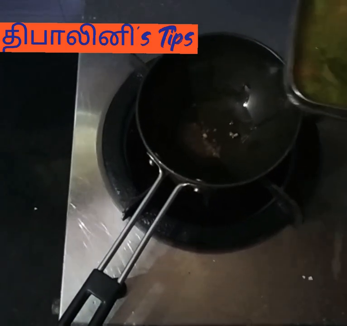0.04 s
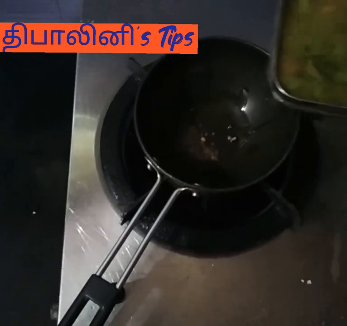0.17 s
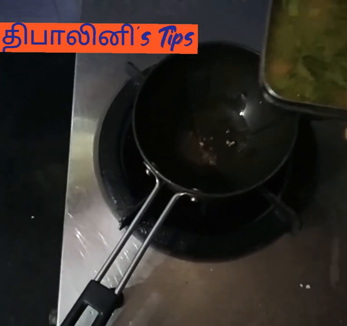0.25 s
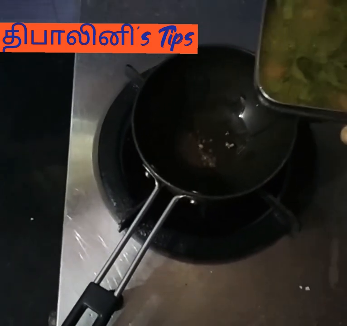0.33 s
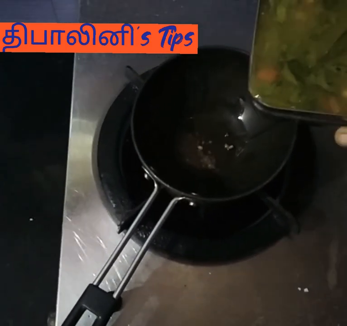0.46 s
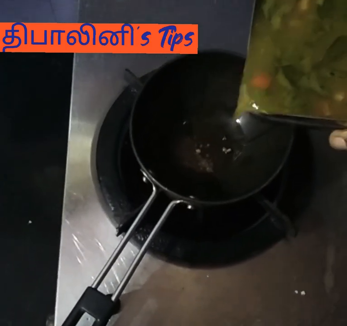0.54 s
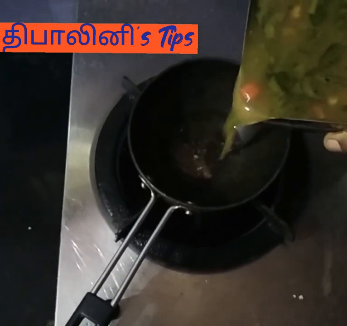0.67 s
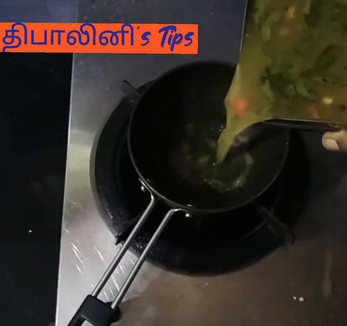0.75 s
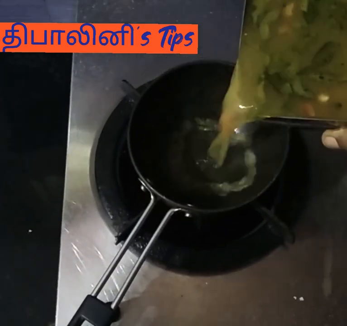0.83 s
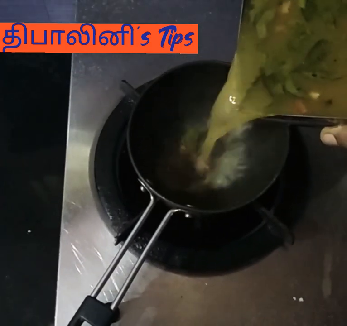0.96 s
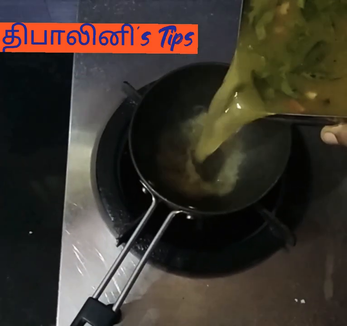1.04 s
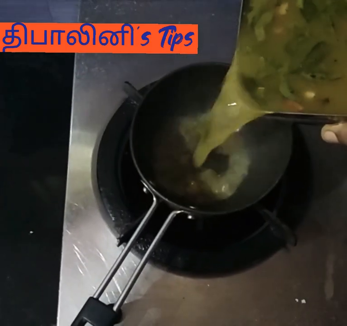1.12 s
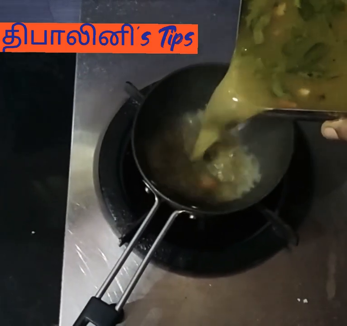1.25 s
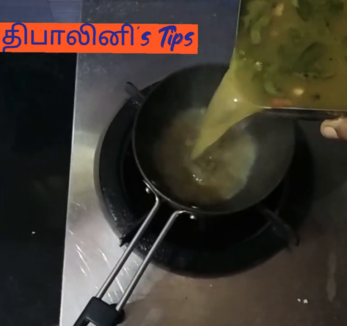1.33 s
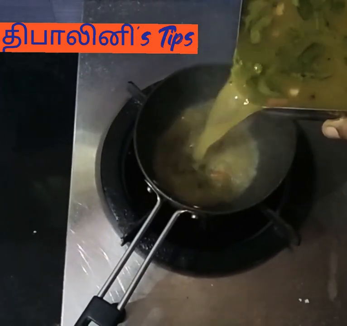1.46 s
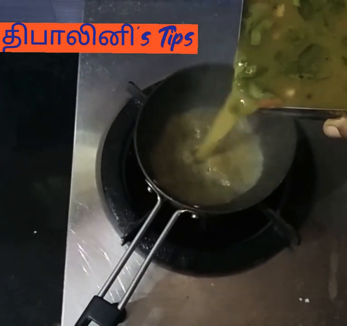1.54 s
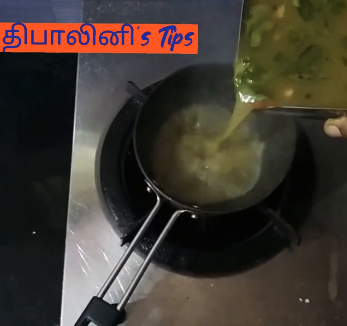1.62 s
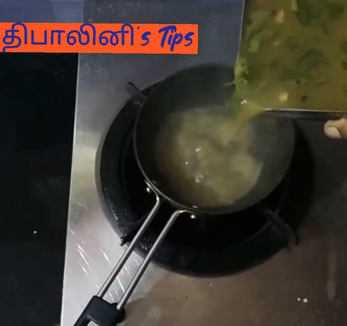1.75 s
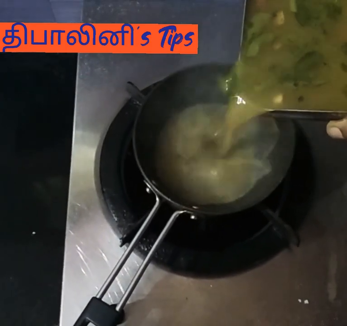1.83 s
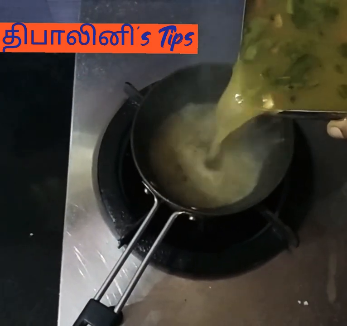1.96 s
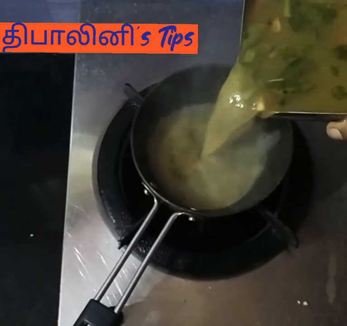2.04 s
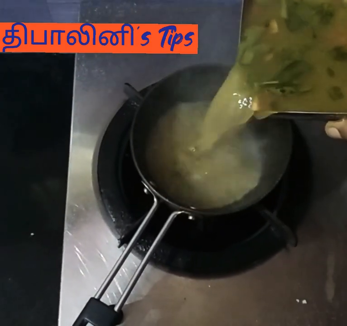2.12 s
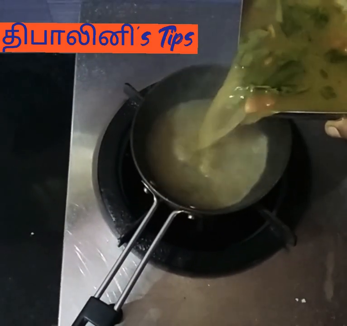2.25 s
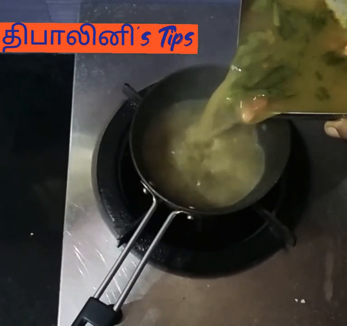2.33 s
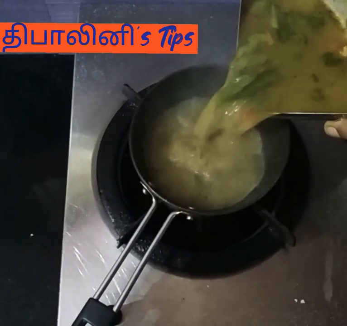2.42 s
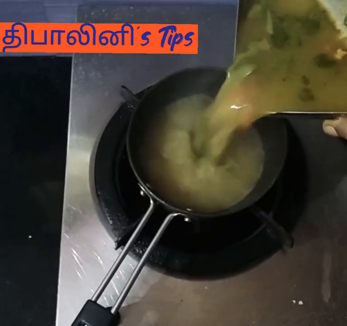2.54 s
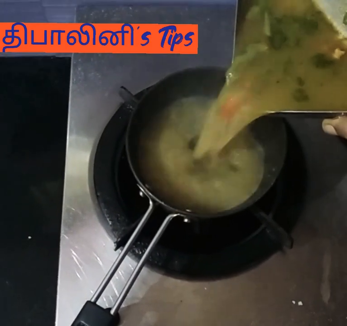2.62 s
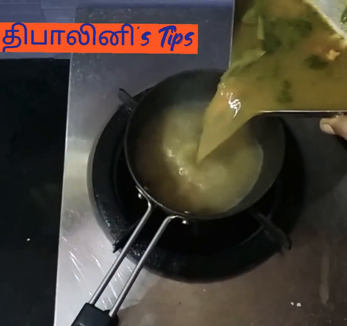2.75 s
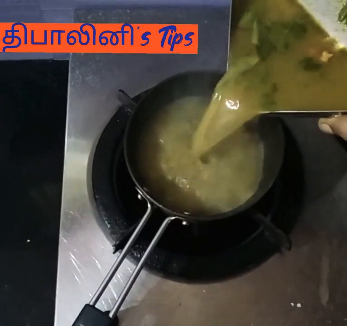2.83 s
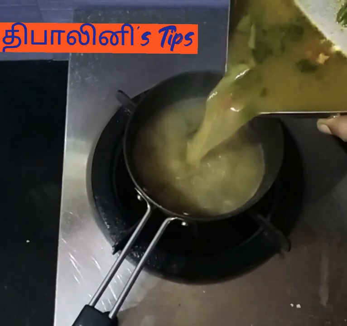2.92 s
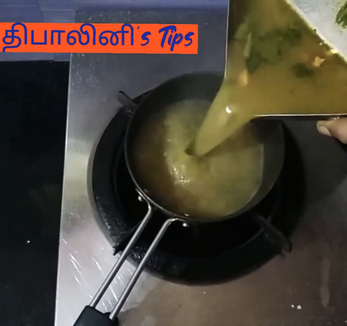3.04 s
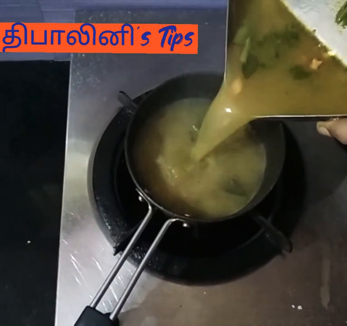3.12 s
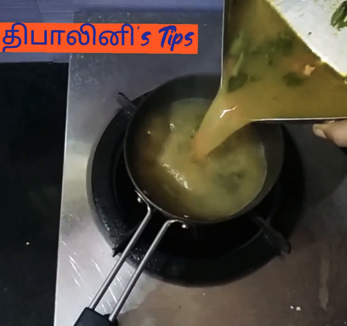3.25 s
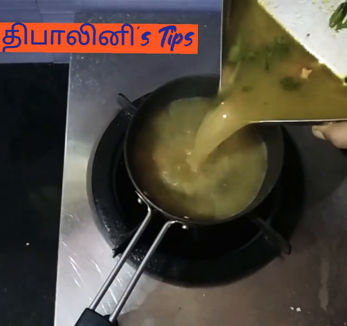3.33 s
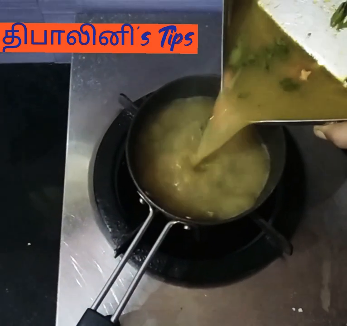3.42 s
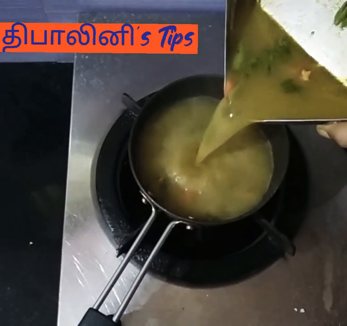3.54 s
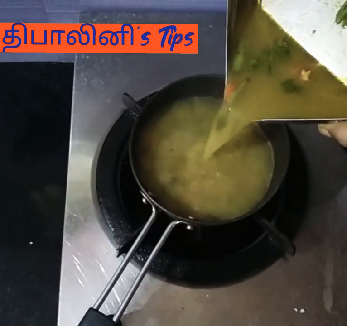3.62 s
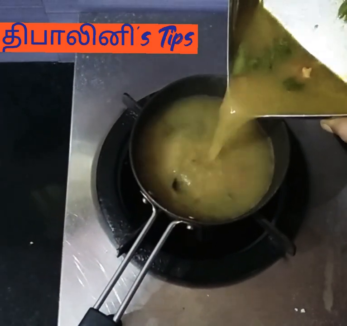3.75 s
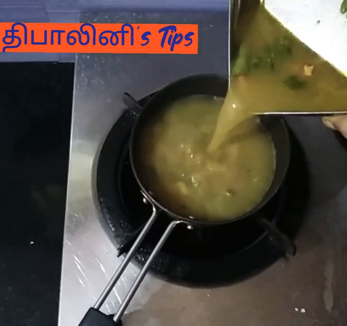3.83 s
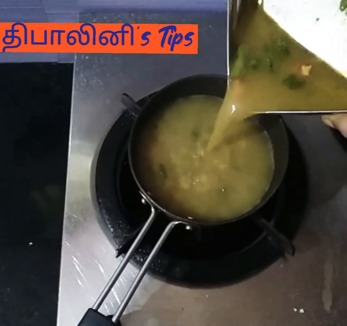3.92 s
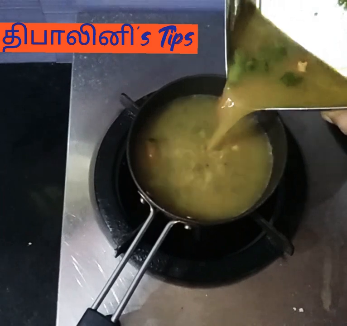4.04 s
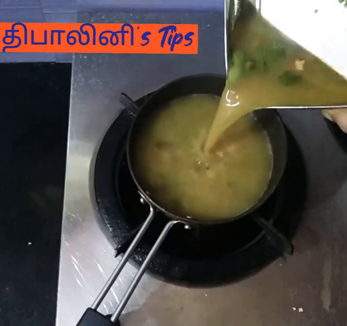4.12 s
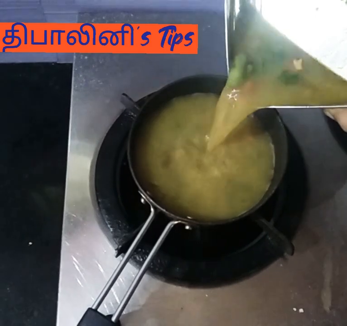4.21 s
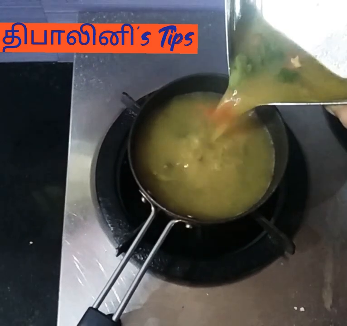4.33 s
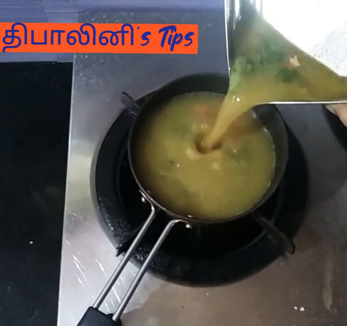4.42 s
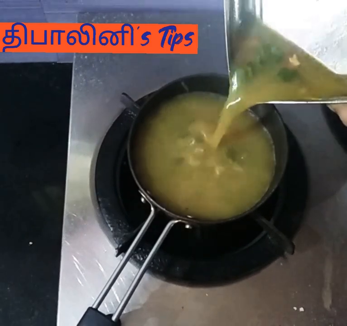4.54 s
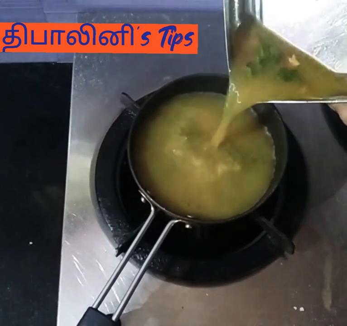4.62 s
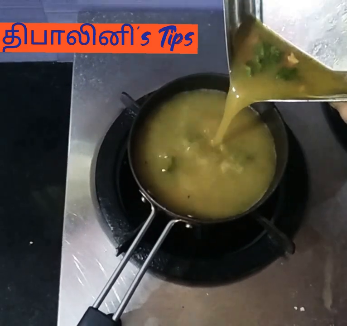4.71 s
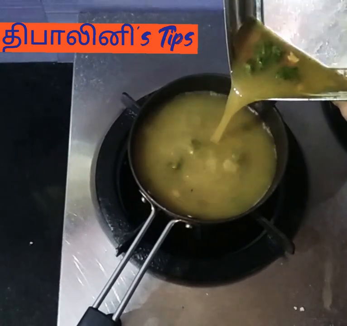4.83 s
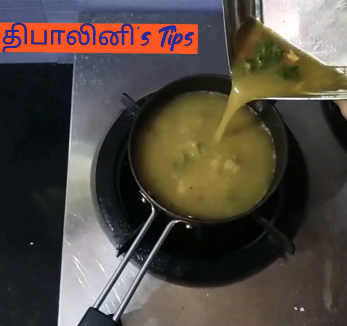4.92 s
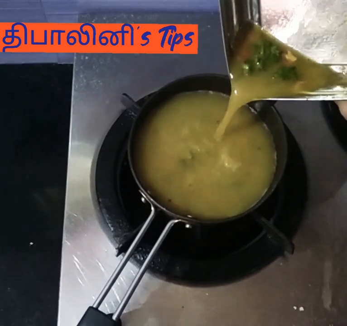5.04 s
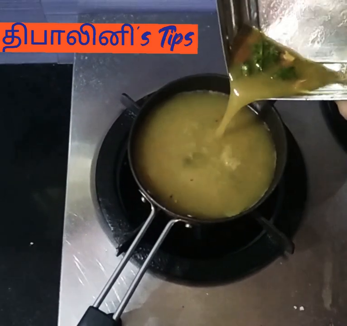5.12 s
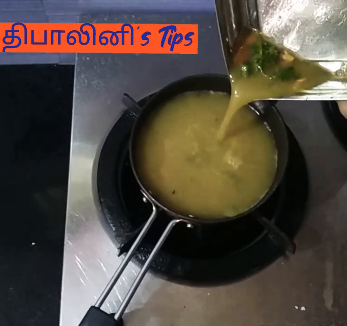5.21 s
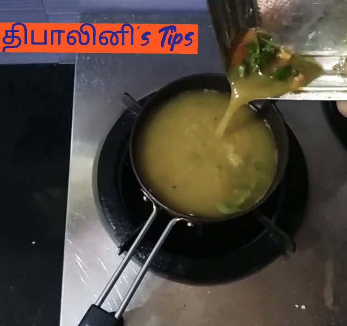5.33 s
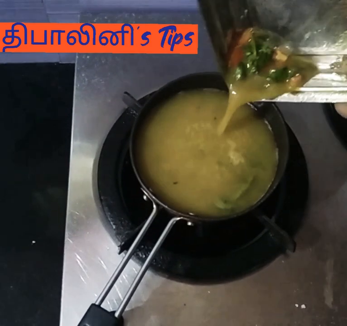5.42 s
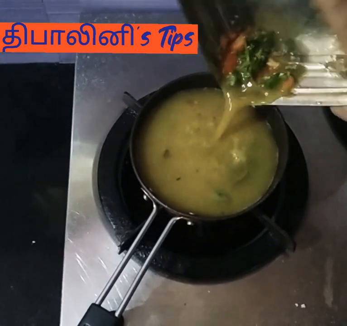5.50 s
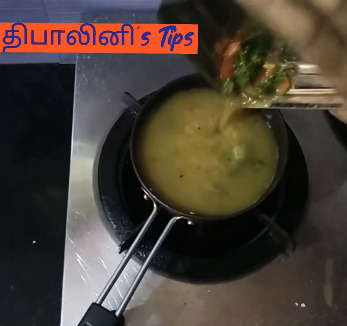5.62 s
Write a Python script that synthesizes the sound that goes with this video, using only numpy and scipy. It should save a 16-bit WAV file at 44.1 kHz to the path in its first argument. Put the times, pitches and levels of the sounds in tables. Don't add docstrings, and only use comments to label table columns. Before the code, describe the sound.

A quiet kitchen with faint frying for half a second, then thin soup poured into very hot oil in a small metal pan. Snaps at contact give way at once to a dense, bright, crackling sizzle with a ringing pan colour. It holds until about four seconds, then fades as the pan cools, leaving sharp spits and a few low plops. Close phone from above, overloading on the hardest spits.

```python
import sys
import numpy as np
from scipy import signal
from scipy.io import wavfile
from scipy.ndimage import uniform_filter1d

SR = 44100
rng = np.random.default_rng(int(sys.argv[2]) if len(sys.argv) > 2 else 0)


def linear_from_db(decibels):
    return 10 ** (np.asarray(decibels, float) / 20)


def generate_wav(sig):
    pcm = np.round(np.clip(np.atleast_2d(sig).T, -1, 1) * 32767).astype(np.int16)
    wavfile.write(sys.argv[1], SR, pcm)


N = 250047
POUR_START_S = 0.49
CONTROL_STEP = 128
HOP, FIRST_FRAME, BAND_BINS = 928, 300, 32

# start_s, height (signed, 0-1 of full scale)
SPIKES = [
    (.5999, -.7),
    (.9603, .75),
    (1.0163, .6),
    (4.2260, .6),
    (4.3383, .55),
    (4.8560, .65),
    (5.3573, .8),
]


def sizzle():
    # pitch_hz, level_db (per Hz)
    sizzle_colour = [(150, -26), (250, -30.5), (860, -14.5), (938, -18.5), (1140, -15.5), (1420, -12),
                     (1950, -11), (5630, -4.5), (9830, 1.5), (16000, -2)]
    # pitch_hz, width_hz, lift_db
    pan_modes = [(537, 9.2, 8.5), (868, 36, 5), (1410, 44, -5.5), (2660, 110, -3), (1133, 14, 8),
                 (1153, 25, 8.5), (1310, 14.6, 5.5), (1587, 46, 5.5), (1920, 65, 6.5), (3140, 490, 1.5),
                 (4046, 26, 0.5), (5080, 390, 0)]
    # start_s, lift_db
    air_lift = [
        (.5, 3),
        (1.5, 4),
        (2.4, 5.5),
        (3.0, 6.5),
        (3.6, 5),
        (4.1, 3.5),
        (5.6, 2),
    ]
    s = np.arange(0, N, CONTROL_STEP) / SR
    t = np.arange(N) / SR
    boil_db, ring_db, crackle_db, hiss_db = swells_db(s)
    swells = np.array([boil_db + 46.0, ring_db + 42.5, crackle_db + 28, hiss_db + 23.5])
    anchors = np.log([810, 1050, 2660, 10500])
    cracks = grains(per_s=5000.0, spread_db=3.5, clump_db=3.5)
    steam = rng.standard_normal((2, N)) + 0.4 * fizz(per_s=1500.0, cycles=50.0)
    surge = drift(21.0)

    def mixture(k, hz):
        share = np.clip(np.interp(np.log(hz), anchors, [0.3, 0.35, 0.55, 0.75]), 0, 1)
        return np.sqrt(1 - share ** 2) * steam[k % 2] + share * cracks

    out = np.zeros(N)
    for hz, band in bands(mixture):
        shares = [np.interp(np.log(hz), anchors, row) for row in np.eye(4)]
        level_db = np.interp(t, s, shares @ swells) + at_hz(sizzle_colour, hz)
        out += linear_from_db(level_db + 0.37 * surge + 0.6 * drift(4.2)) * band
    air_gain = linear_from_db(np.interp(t, *np.transpose(air_lift)))
    out += (air_gain - 1) * resonance(out, 2290, 384)
    empty_gain = linear_from_db(5 * np.exp(-t / 1.5))
    out += (empty_gain - 1) * resonance(out, 1220, 140)
    out += sum((linear_from_db(lift_db) - 1) * resonance(out, hz, width_hz) for hz, width_hz, lift_db in pan_modes)
    out = signal.sosfilt(signal.butter(4, 190, "high", fs=SR, output="sos"), out)
    return linear_from_db(-14) * out * (t > POUR_START_S)


def swells_db(s):
    # start_s, level_db (of the hiss)
    vigour = [(0.49, -39), (0.51, -28), (0.59, -29.5), (0.66, -24), (0.85, -24.5), (0.95, -20.5),
              (1.04, -25), (1.32, -25), (1.7, -23), (2.09, -23.5), (2.55, -24.5), (2.91, -23.5),
              (3.24, -24), (3.45, -23.5), (3.95, -26), (4.37, -28.5), (5.03, -31.5), (5.67, -37.5)]
    # start_s, half_s, hiss_change_db, extra_db (deeper layers)
    stream_wavers = [(0.523, .02, 1.5, 1), (0.565, .01, 2.5, -1), (.58, 0.0064, -2, 9),
                     (0.824, 0.012, -1, 5.5), (1.023, .02, 0.5, 2), (0.612, 0.011, 3.5, 2),
                     (0.655, 0.0069, 4, 1), (0.746, 0.047, 1.5, 4), (1.097, .02, 0, 2),
                     (1.136, 0.016, 3, 3.5), (1.263, 0.02, -3.5, -1), (1.514, 0.01, -5, -2.5),
                     (1.85, 0.064, 0, 1), (2.237, 0.037, 1.5, -1), (2.274, .015, -2, 0.5),
                     (2.486, 0.0078, -6.5, 11.5), (3.674, 0.041, 0, -1), (3.978, 0.013, 1, 5.5),
                     (4.006, .015, -6.5, -3), (4.2, .05, 0.5, 0), (4.31, 0.013, -3, -2),
                     (4.346, 0.0088, 0.5, 3), (5.075, .025, 0, 1), (5.493, .012, -1, 0),
                     (5.53, 0.012, 1, -10), (5.61, 0.03, 3, 0)]
    at_s, half_s, change_db, extra_db = np.transpose(stream_wavers)
    hiss_db = np.interp(s, *np.transpose(vigour)) + bumps(s, at_s, half_s, change_db)
    extra = bumps(s, at_s, half_s, extra_db)
    since = np.maximum(s - POUR_START_S, 0)

    def deeper(below_db, late_db, wetting_s, filling_db_per_s, waver_share):
        wetting_db = late_db * np.exp(-since / wetting_s)
        return hiss_db + below_db + wetting_db + filling_db_per_s * since + waver_share * extra

    crackle_db = deeper(-7, -16, 0.049, 1.53, 0.73)
    ring_db = deeper(-18, -15.5, 0.24, 0, 0.61)
    boil_db = deeper(-24.5, -23, 0.32, 1.49, 1)
    return boil_db, ring_db, crackle_db, hiss_db


def grains(per_s, spread_db, clump_db):
    sizes = linear_from_db(spread_db * np.minimum(rng.exponential(1, N), 5)) * rng.choice([-1, 1], N)
    born = rng.random(N) < per_s * linear_from_db(clump_db * drift(60.0)) / SR
    return rms_one(sizes * born)


def fizz(per_s, cycles):
    clicks = grains(per_s, spread_db=4.0, clump_db=2.0)
    dealt = rng.integers(0, 24, N)
    out = np.zeros(N)
    for k, hz in enumerate(np.geomspace(900, 7000, 24)):
        ringing = resonance(clicks * (dealt == k) + 1e-18, hz, 3.7 * hz / cycles)
        out += ringing * (cycles / hz) ** 0.5
    return rms_one(out)


def spits():
    # start_s, level_db (peak)
    small_drops = [(0.41, -30), (0.421, -34), (0.437, -38), (0.456, -35), (0.491, -33), (0.5037, -29),
                   (0.529, -8), (0.5525, -5.5), (0.5652, -5.5), (1.027, -4), (1.0517, -2), (2.4982, -4),
                   (4.0257, -14), (4.0594, -6.5), (4.226, -8), (4.2957, -5), (4.337, -7), (4.454, -7.5),
                   (4.814, -14), (4.89, -10), (5.1365, -9), (5.167, -7.5), (4.7795, -8), (4.575, -14),
                   (5.1998, -10), (5.5157, -2), (5.584, -15)]
    # start_s, level_db (peak), body_db (against the snap)
    fat_drops = [(1.109, -15, -9), (1.131, -3, -24), (4.6087, -19, 4), (4.7287, -6.5, -9),
                 (4.8565, -12, -11), (4.9742, -8, -13), (5.0474, -17, -6), (5.0696, -14, -5),
                 (5.1045, -8, -11), (5.2167, -14, -4), (5.2769, -10.5, -9), (5.322, -22.5, 3),
                 (5.3576, -7, -20), (5.426, -17, -8), (5.6088, -10.5, -9.5), (5.6502, -11.5, -21)]
    small_body_db = -29.5
    drops = [(s, peak_db, small_body_db) for s, peak_db in small_drops] + fat_drops
    out = np.zeros(N)
    t = np.arange(1500) / SR
    draws = rng.standard_normal((len(drops), len(t)))
    draws[:, 0] = 1.6 * np.sign(draws[:, 0])
    for (s, peak_db, body_db), noise in zip(drops, draws):
        burst = noise * (np.exp(-t / 0.0012) + 0.25 * np.exp(-t / 0.005))
        snap = resonance(burst, 10460, 7100) + linear_from_db(body_db + 5.5) * resonance(burst, 3060, 5700)
        at = round(s * SR)
        out[at:at + len(t)] += (linear_from_db(peak_db - 4) * snap)[:N - at]
    return out


def plops():
    # start_s, level_db (peak), pitch_hz
    lump_knocks = [(4.034, -27, 530), (4.057, -23.5, 544), (4.164, -20.5, 493), (4.177, -20, 368),
                    (4.194, -22, 357), (4.19, -28, 490), (4.209, -23, 500), (4.321, -21, 730),
                    (5.552, -25, 506), (5.566, -34, 487), (5.58, -23, 492), (5.603, -26, 495),
                    (4.054, -32, 373),
        (4.248, -33, 355),
        (4.274, -40, 366),
        (5.554, -33, 361),
        (5.568, -29, 373),
    ]
    out = np.zeros(N)
    t = np.arange(3000) / SR
    for s, peak_db, hz in lump_knocks:
        swell = (1 - np.exp(-t / 0.004)) * np.exp(-t * hz / 2.9)
        tone = np.sin(2 * np.pi * hz * t * (0.991 + 0.2 * t))
        at = round(s * SR)
        out[at:at + len(t)] += (linear_from_db(peak_db - 3.5) * swell * tone)[:N - at]
    return out


def ticks():
    since = np.arange(N) / SR - POUR_START_S
    bursts = grains(per_s=110, spread_db=1.0, clump_db=5.0)
    fine = resonance(bursts + 1e-18, 5600, 6000)
    return linear_from_db(-52 + 1.5 * since) * rms_one(fine) * (since > 0)


def kitchen():
    # pitch_hz, level_db (per Hz)
    room_colour = [(24, -46), (40, -20), (199, -3.5), (382, -7), (444, 0.5), (751, -5.5), (1180, -1),
                   (1520, -8), (4930, -13.5), (11300, -5.5), (16000, -12.5)]
    # pitch_hz, width_hz, level_db
    motor_lines = [(361, 25, -69), (520.5, 20, -63), (810, 8.7, -64), (2420, 100, -69), (3530, 84, -65)]
    # start_s (centre), half_s, level_db (peak)
    burner_puffs = [(.03, 0.044, -64), (0.163, .06, -68), (.45, .05, -77), (.9, .08, -81),
                    (1.403, 0.061, -76), (1.746, 0.097, -67), (1.997, 0.054, -63), (2.508, .05, -74),
                    (2.78, 0.13, -64.5), (3.167, 0.06, -62), (3.546, 0.08, -60), (4.327, 0.077, -64),
                    (4.9, 0.11, -68), (5.38, .08, -77)]
    s = np.arange(0, N, CONTROL_STEP) / SR
    t = np.arange(N) / SR
    ducked = 1 - np.exp(-np.maximum(s - POUR_START_S, 0) / 0.11)
    back = 0.5 + 0.5 * np.tanh((s - 1.8) / 0.32)
    room_db = -2 - 10 * ducked * (1 - back) + 2 * back
    white = rng.standard_normal((2, N)) + 0.4 * grains(per_s=900.0, spread_db=4.0, clump_db=3.0)
    air = np.zeros(N)
    for hz, band in bands(lambda k, hz: white[k % 2]):
        air += linear_from_db(at_hz(room_colour, hz) + 1.2 * drift(6.0)) * band
    lines = sum(linear_from_db(level_db) * narrow(white[0], hz, width_hz) for hz, width_hz, level_db in motor_lines)
    room = linear_from_db(-45 - 1.5) * rms_one(air) + lines
    at_s, half_s, peak_db = np.transpose(burner_puffs)
    puffs = linear_from_db(-83) + bumps(s, at_s, half_s, linear_from_db(peak_db))
    drone = np.interp(t, s, puffs) * linear_from_db(3.0) * narrow(white[1], 200.1, 6.1)
    return linear_from_db(np.interp(t, s, room_db) + drift(4.6)) * room + drone


def rms_one(x):
    return x / np.sqrt(np.mean(x ** 2) + 1e-20)


def at_hz(points, hz):
    points = np.array(points)
    return np.interp(np.log(hz), np.log(points[:, 0]), points[:, 1])


def bumps(t, s, half_s, height):
    return np.exp(-0.5 * ((t[:, None] - s) / half_s) ** 2) @ height


def drift(rate_hz):
    step, settle = 32, 1000
    r = np.exp(-2 * np.pi * rate_hz * step / SR)
    noise = rng.standard_normal(N // step + settle + 2)
    slow = signal.lfilter([1], [1, -2 * r, r * r], noise)[settle:]
    return np.interp(np.arange(N) / step, np.arange(len(slow)), rms_one(slow))


def resonance(x, hz, width_hz):
    r = np.exp(-np.pi * width_hz / SR)
    poles = [1, -2 * r * np.cos(2 * np.pi * hz / SR), r * r]
    return signal.lfilter([(1 - r * r) / 2, 0, (r * r - 1) / 2], poles, x)


def narrow(x, hz, width_hz):
    return rms_one(resonance(resonance(x, hz, width_hz), hz, width_hz))


def bands(source):
    edges = 40 * 2 ** (np.arange(27) / 3)
    for k, (low, high) in enumerate(zip(edges, edges[1:])):
        hz = np.sqrt(low * high)
        band_pass = signal.butter(2, [low, high], "band", fs=SR, output="sos")
        yield hz, signal.sosfilt(band_pass, source(k, hz))


def scene():
    mono = sizzle() + spits() + plops() + ticks() + kitchen()
    return np.array([mono, mono])


def overload(x):
    n = np.arange(N)
    jumps = sum(height * np.exp(-0.5 * ((n - s * SR) / 1.26) ** 2) for s, height in SPIKES)
    rumble = signal.sosfilt(signal.butter(3, [12, 40], "band", fs=SR, output="sos"), x ** 2)
    return x + jumps + 0.03 * rumble


def lapped(x, alter):
    window = signal.windows.kaiser_bessel_derived(2 * HOP, 4 * np.pi)
    phase = np.outer(np.arange(2 * HOP) + 0.5 + HOP / 2, np.arange(HOP) + 0.5)
    basis = np.cos(np.pi / HOP * phase) * window[:, None]
    lead = 2 * HOP - FIRST_FRAME
    padded = np.pad(x, (lead, 3 * HOP))
    starts = np.arange(len(padded) // HOP - 1) * HOP
    spectra = padded[starts[:, None] + np.arange(2 * HOP)] @ basis
    change = alter(spectra, (starts + HOP - lead) / SR) @ basis.T * 2 / HOP
    out = np.zeros(len(padded))
    out[:len(starts) * HOP] += change[:, :HOP].ravel()
    out[HOP:(len(starts) + 1) * HOP] += change[:, HOP:].ravel()
    return x + out[lead:lead + N]


def starve(spectra, mid_s):
    hz = np.arange(HOP) * SR / 2 / HOP
    around = np.sqrt(uniform_filter1d(spectra ** 2, size=40, axis=1))
    from_spikes_s = abs(mid_s[:, None] - np.array(SPIKES)[:, 0])
    calm = np.all(from_spikes_s > HOP / SR, axis=1)[:, None]
    weak = abs(spectra) < 0.75 * around
    return -spectra * calm * weak * ((hz > 1300) & (hz < 8000))


def flip_bands(spectra, mid_s):
    # start_s, end_s, lowest_hz, share (of flipped bands, 0-1)
    flip_spans = [(.505, .68, 9000, .55), (.68, 2.91, 9600, .42), (2.99, 3.41, 9600, .4),
                  (3.64, 3.77, 9600, .45), (3.82, 3.98, 9600, .35), (4.08, 4.17, 9600, .45),
                  (4.36, 4.66, 9600, .3), (4.78, 4.96, 9600, .45), (5.52, 5.61, 9600, .25),
                  (1.09, 1.11, 6700, .9), (1.2, 1.22, 7400, .6)]
    dice = rng.random((len(mid_s), HOP // BAND_BINS))
    held = rng.random(dice.shape) < 0.25
    dice[1:] = np.where(held[1:], dice[:-1], dice[1:])
    low_hz = np.arange(dice.shape[1]) * BAND_BINS * SR / 2 / HOP
    dice = dice - 0.17 * np.clip(low_hz / 3000 - 3.2, 0, 1)
    dice = dice - 0.08 * rng.standard_normal((len(mid_s), 1))
    flipped = np.zeros(dice.shape, bool)
    for start_s, end_s, lowest_hz, share in flip_spans:
        inside = ((mid_s >= start_s) & (mid_s < end_s))[:, None]
        flipped |= inside & (low_hz >= lowest_hz) & (dice < share)
    return -2 * spectra * np.repeat(flipped, BAND_BINS, axis=1)


def low_pass(x):
    return signal.sosfilt(signal.butter(12, 16850, fs=SR, output="sos"), x)


def record(dry):
    mono = dry[0] + (linear_from_db(6.5) - 1) * resonance(dry[0], 10330, 1740)
    mono = 0.9 * np.tanh(overload(mono) / 0.9)
    mono = signal.sosfilt(signal.ellip(10, 0.3, 60, 15800, fs=SR, output="sos"), mono)
    left = lapped(mono, starve)
    right = lapped(left, flip_bands)
    return low_pass(np.array([left, right]))


dry = scene()
out = record(dry)
generate_wav(out)
```